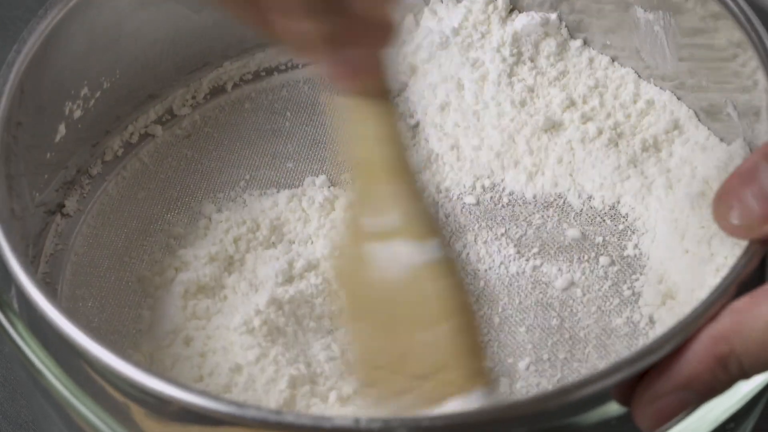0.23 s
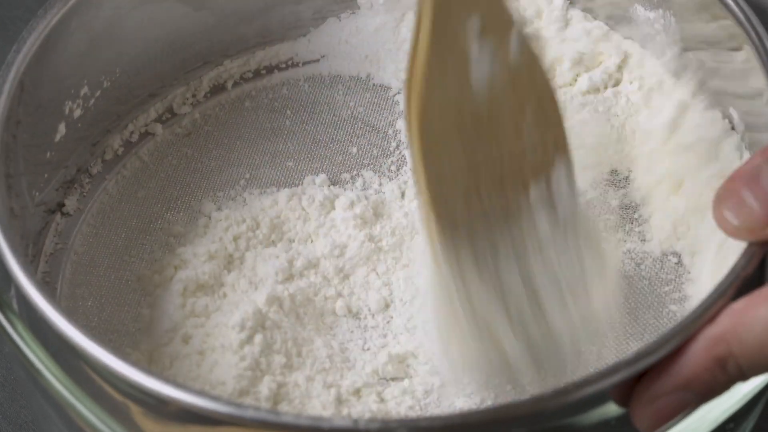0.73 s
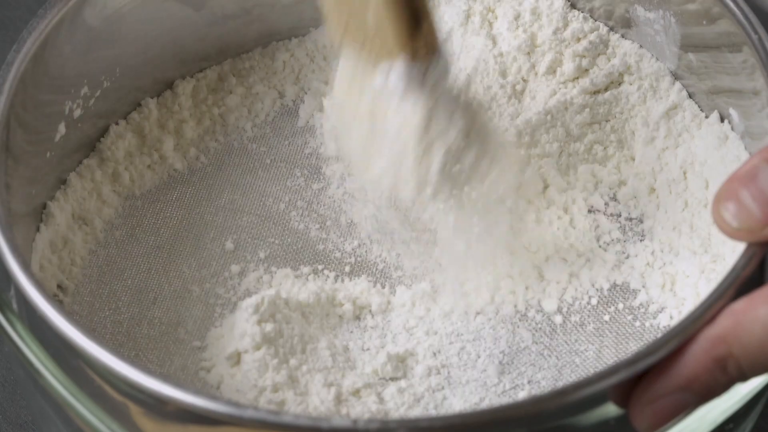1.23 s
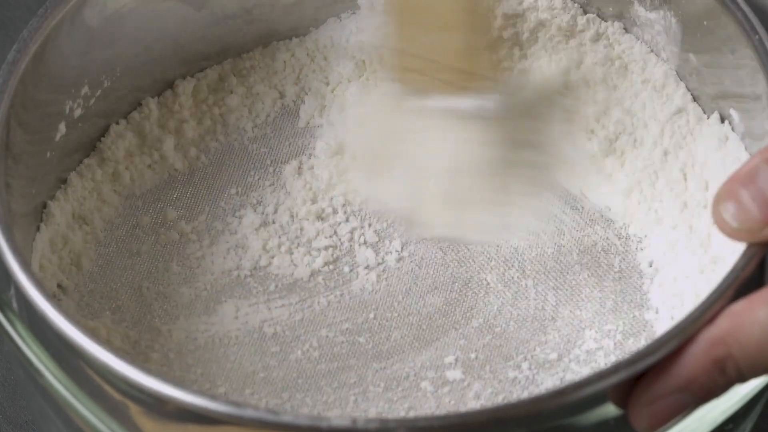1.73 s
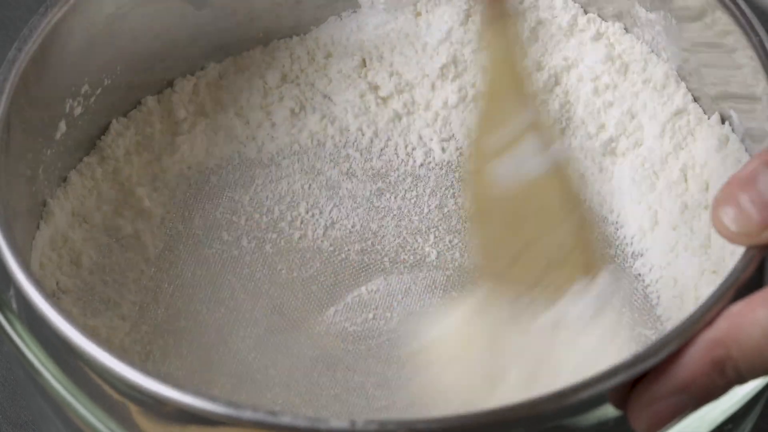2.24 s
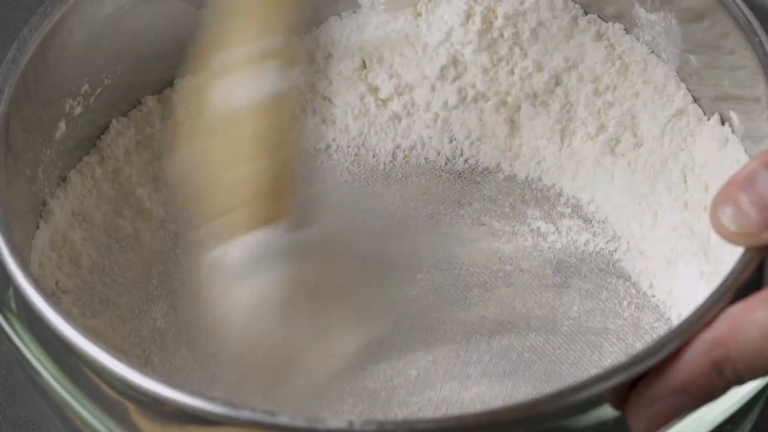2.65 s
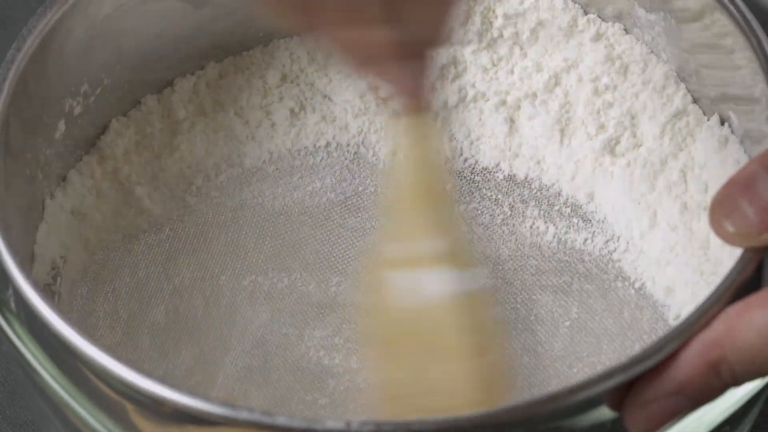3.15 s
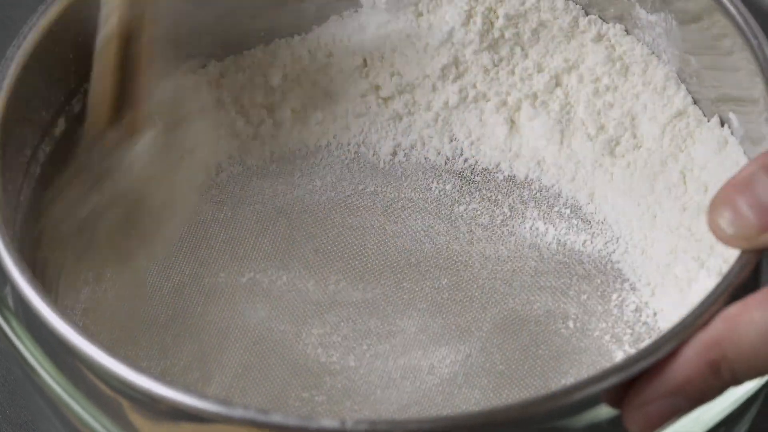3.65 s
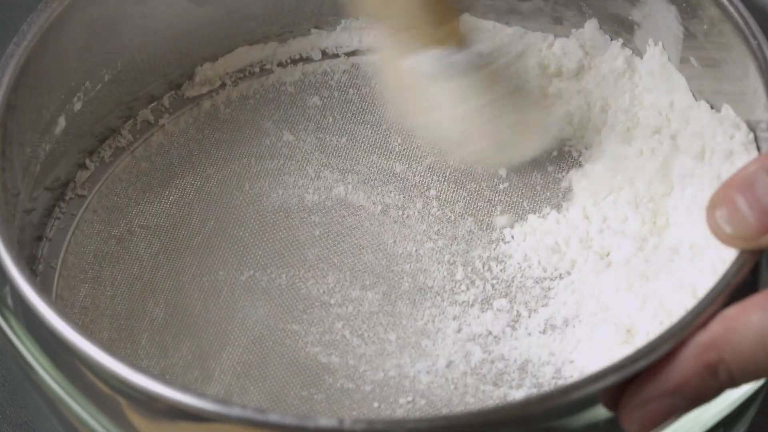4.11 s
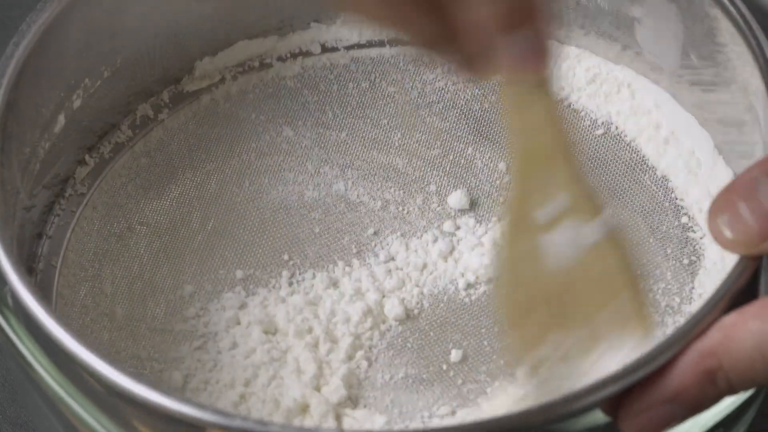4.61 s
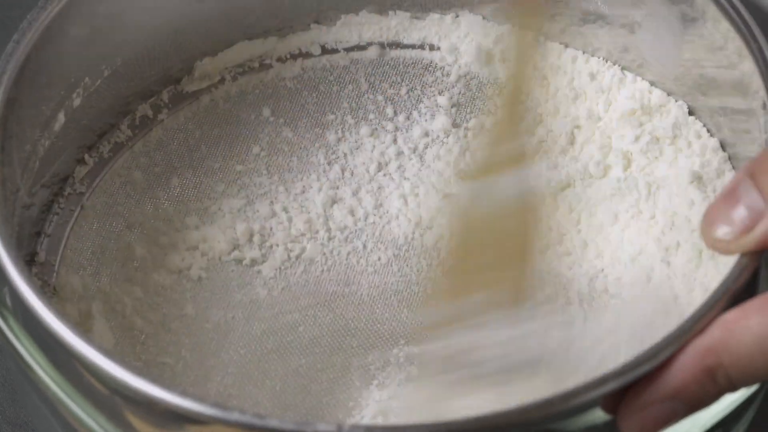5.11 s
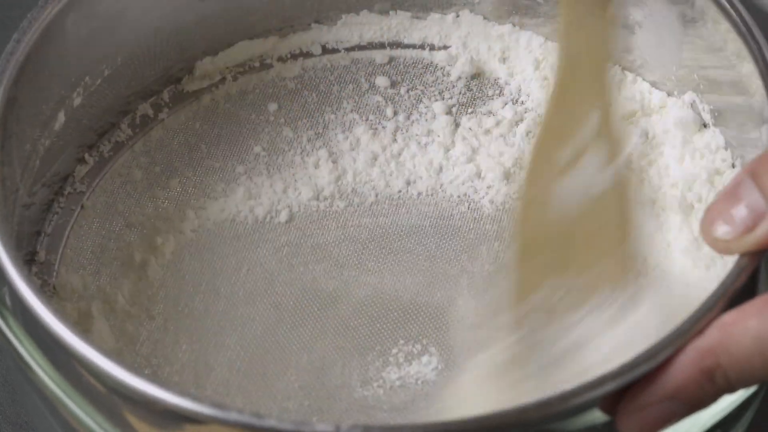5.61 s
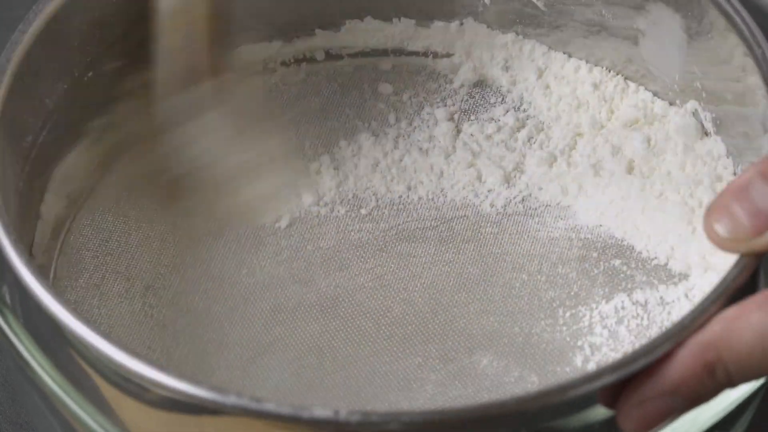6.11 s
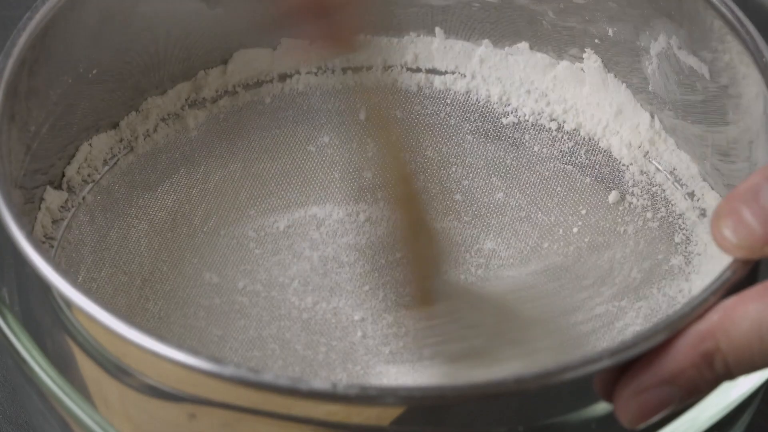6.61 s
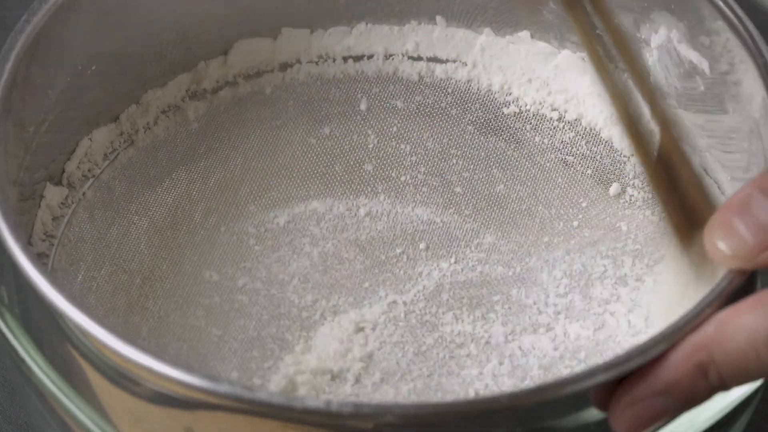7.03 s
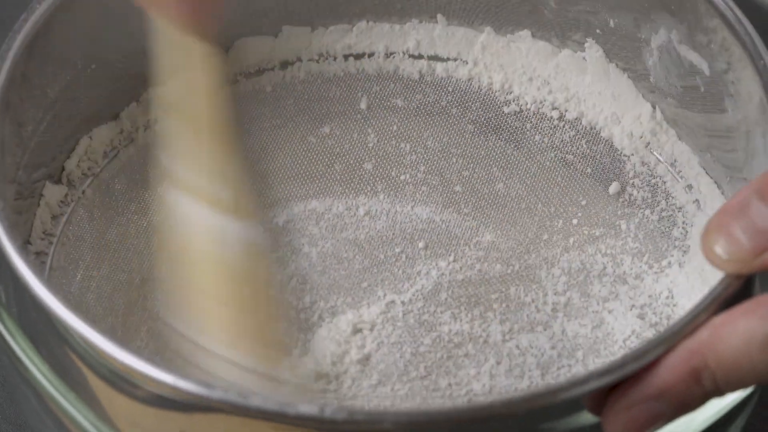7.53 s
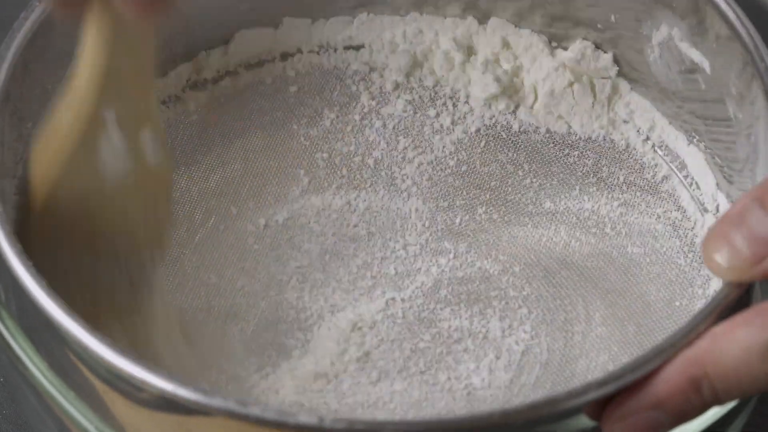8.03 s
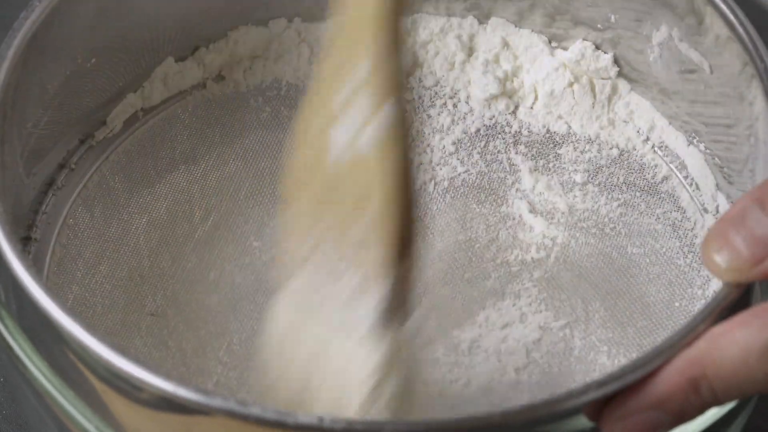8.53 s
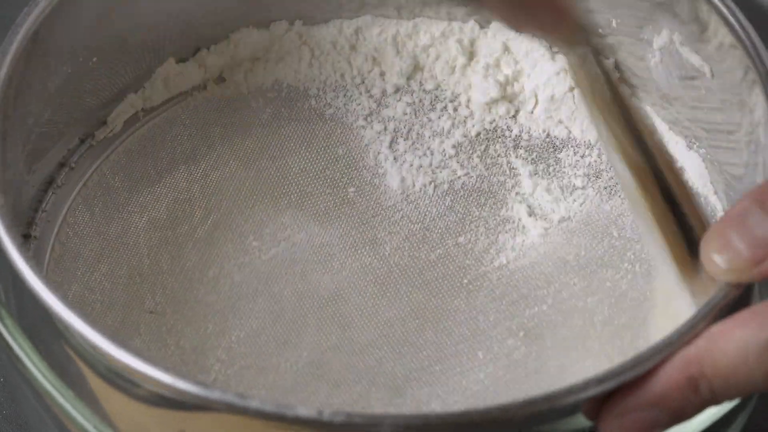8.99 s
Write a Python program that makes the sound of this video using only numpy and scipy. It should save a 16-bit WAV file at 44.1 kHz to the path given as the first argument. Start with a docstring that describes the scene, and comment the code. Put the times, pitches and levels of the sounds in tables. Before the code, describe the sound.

Close, dry, raspy brushing of flour over wire mesh in a quiet kitchen, quick strokes with fizzing hiss and a brief handle knock.

```python
"""Brisk scraping is heard first: a bristle brush scrubs flour through a fine steel sieve in a quiet kitchen.
Bristle flicks are dense random impulses; filtered, they make the drumming mesh, the scrape and the wire hiss.
The wooden handle knocks the rim a few times: damped sines and noise bursts, with a short reverberant tail.
Short ticks and soft low bumps lie between; filtered noise gives the room tone and a fuzzy hum.
The microphone is close and mono, copied to both channels."""
import sys
import numpy as np
from scipy import signal
from scipy.fft import rfft, irfft, next_fast_len
from scipy.io import wavfile
from scipy.ndimage import uniform_filter1d

SR = 44100
rng = np.random.default_rng(int(sys.argv[2]) if len(sys.argv) > 2 else 0)


def dump(signal):
    """Clip the signal to [-1, 1] and save it as 16-bit WAV at the path in sys.argv[1]."""
    limited = np.clip(np.atleast_2d(signal).T, -1, 1)
    pcm = np.round(limited * 32767).astype(np.int16)
    wavfile.write(sys.argv[1], SR, pcm)


N = 408366  # length in samples

# pressed strokes: [fastest moment t/s, speeding up t/s, slowing down t/s, scrape level/dB,
#   wire hiss level/dB re scrape, drumming level/dB re scrape, low edge of drumming f/Hz]; before LAYER_TRIM
STROKES = [(0.043, 0.032, 0.11, -41.0, -5, -3.5, 794), (0.086, 0.098, 0.08, -53, -3.5, 0.5, 794),
           (0.378, 0.044, 0.081, -39.5, -5.0, -2.5, 850), (0.704, 0.083, 0.092, -41, -7, -6.5, 620),
           (0.999, 0.077, 0.3, -48.5, -1.5, -6, 686), (1.131, 0.218, 0.16, -47, -4.0, -1.5, 680),
           (1.487, 0.054, 0.1, -67, 1.5, -9.5, 595), (1.721, 0.052, 0.1, -42, -3, -5.5, 593),
           (1.847, 0.23, 0.19, -46.5, -4.5, -0.5, 597), (1.965, 0.14, 0.11, -43.0, -7, -8, 535),
           (2.08, 0.11, 0.11, -44.5, 0, -2.5, 604), (2.187, 0.079, 0.084, -53, 2.5, -0.5, 620),
           (2.264, 0.097, 0.15, -48, -1, -6, 604), (2.368, 0.092, 0.109, -46.5, -3.5, -2, 610),
           (2.475, 0.075, 0.17, -48.5, -6, -5.5, 940), (2.565, 0.12, 0.076, -43.5, -3, -7, 616),
           (2.634, 0.041, 0.078, -54.5, 3, -3, 730), (2.725, 0.08, 0.1, -46, -1.5, -8.5, 655),
           (2.818, 0.089, 0.089, -45.5, -2.5, -6, 616), (2.896, 0.049, 0.13, -49.5, 0, -3, 610),
           (3.165, 0.11, 0.27, -49.0, -2, -9.5, 1160), (3.307, 0.065, 0.09, -46, -5.5, -9.5, 875),
           (3.605, 0.13, 0.25, -51, 1.5, -15.5, 1090), (3.743, 0.159, 0.29, -53.5, 1, -9.5, 830),
           (3.911, 0.23, 0.16, -48.5, -3.5, -9.5, 810), (4.034, 0.167, 0.062, -64.5, 1.5, -25, 970),
           (4.289, 0.072, 0.116, -55.5, 1, -16, 1270), (4.352, 0.076, 0.1, -52.5, -3.5, -20, 1330),
           (4.421, 0.041, 0.084, -52.5, -1.5, -8, 920), (4.763, 0.078, 0.082, -44, -4, -5, 760),
           (5.036, 0.13, 0.27, -47.5, -4.5, -9.0, 610), (5.084, 0.148, 0.11, -42, -4, -5, 590),
           (5.334, 0.15, 0.12, -39.5, -3.0, -9, 805), (5.5, 0.2, 0.2, -51, -1, -10.5, 605),
           (5.62, 0.21, 0.1, -43, -1, -11, 583), (5.735, 0.088, 0.158, -47, -1, -12.5, 540),
           (5.87, 0.12, 0.062, -42, 0, -9.5, 760), (6.079, 0.12, 0.169, -46.5, 1, -10, 1190),
           (6.162, 0.111, 0.141, -47.5, -4, -5.5, 1100), (6.29, 0.18, 0.22, -47.5, 0.0, -11, 1020),
           (6.37, 0.096, 0.167, -59.5, -3.5, -25, 1250), (6.704, 0.087, 0.085, -47.5, -3.0, -10, 690),
           (6.946, 0.045, 0.078, -44.0, -1, -6.5, 620), (7.201, 0.05, 0.129, -50, -10, -15, 720),
           (7.232, 0.12, 0.062, -54.5, 2.5, -7.5, 736), (7.442, 0.043, 0.096, -41.5, -5.5, -11.5, 960),
           (7.689, 0.056, 0.1, -46.5, -2.5, -17.5, 1100), (7.786, 0.089, 0.11, -41, -5, -11, 940),
           (8.119, 0.14, 0.2, -42.5, -4, -14, 1050), (8.176, 0.13, 0.1, -49.5, -14, -2, 825),
           (8.46, 0.1, 0.17, -55, -0.5, -15.5, 1150), (8.495, 0.085, 0.062, -37.5, -4, -16.5, 1210),
           (8.709, 0.07, 0.059, -44, -3.5, -11.5, 1050), (8.908, 0.04, 0.14, -45, -9, -13.5, 1100),
           (8.938, 0.075, 0.06, -38, -1.5, -14.5, 1100), (9.159, 0.047, 0.067, -41, -3, -19.5, 1180)]
# light touches of the bristle tips as the brush lands, turns or lifts:
#   [peak t/s, rise t/s, fall t/s, hiss level/dB, scrape level/dB re hiss]; before LAYER_TRIM
GRAZES = [(0.012, 0.044, 0.152, -69, -8), (0.29, 0.032, 0.068, -69.5, -15), (0.612, 0.053, 0.132, -60, -18),
          (0.919, 0.041, 0.149, -65, -11), (1.206, 0.033, 0.062, -58, -10), (2.439, 0.031, 0.076, -52, -7),
          (3.038, 0.24, 0.12, -61, -4), (3.504, 0.053, 0.13, -57, -17), (4.227, 0.022, 0.038, -66, -2),
          (4.471, 0.056, 0.039, -59.5, -7), (4.657, 0.042, 0.14, -62.5, -15), (4.95, 0.027, 0.15, -73.5, 0),
          (5.214, 0.066, 0.06, -54.0, -5), (5.989, 0.13, 0.043, -49.5, -9),
          (6.448, 0.0087, 0.036, -58.5, -8), (6.606, 0.028, 0.069, -59, -15),
          (6.864, 0.029, 0.081, -64, -15), (7.11, 0.029, 0.096, -60, -13), (7.38, 0.042, 0.047, -56.5, -13),
          (7.63, 0.075, 0.16, -60.5, -15), (8.005, 0.037, 0.12, -60.0, -13),
          (8.266, 0.045, 0.053, -56.5, -5), (8.376, 0.046, 0.21, -67.5, -4),
          (8.567, 0.014, 0.03, -63.5, -3), (8.867, 0.042, 0.016, -60.5, -11),
          (9.082, 0.033, 0.056, -58.5, -14)]
# exponent of stroke speed giving each layer's amplitude: [scrape, drumming, hiss]
SPEED_POWER = (3.64, 3.15, 2.76)
# gain of each layer: [scrape level/dB, drumming level/dB, hiss level/dB]
LAYER_TRIM = (0.5, -0.1, 0.92)
# flour trickling between strokes: [scrape level/dB, drumming level/dB, hiss level/dB]; before no trim
REST_LEVEL = (-83.5, -92.5, -84.5)
# spectral shapes of the three brush layers: [f/Hz, relative level/dB per Hz]
SCRAPE_SHAPE = [(900, -49), (1500, -17), (2000, -1.5), (3000, 0), (4000, 1.5), (5500, -5), (7000, -10.5),
                (10000, -45)]
DRUM_SHAPE = [(150, -43), (450, -20), (650, -3.5), (950, -2), (1300, 1.5), (1550, -4), (2000, -10),
              (3000, -59)]
HISS_SHAPE = [(3500, -26.5), (5500, -6), (6500, -8), (8000, -1), (10000, -2.5), (12000, -6), (14000, -9.5),
              (16000, -12)]
# moving peak of the scrape band, flattening as the mesh clears: [t/s, centre f/Hz, height level/dB]
SCRAPE_PEAK = [(0.06, 2660, 8), (0.7, 2740, 9.5), (1.05, 2780, 2), (1.8, 2800, 7), (2.1, 3050, 8),
               (2.3, 2920, 8.5), (2.7, 3100, 10.5), (3.1, 3060, 10), (3.3, 2810, 7), (3.62, 2990, 5.5),
               (3.9, 2720, 5.5), (4.4, 3050, 6), (5.0, 2800, 5), (5.25, 3120, 6), (5.8, 3080, 5.5),
               (6.3, 2720, 2), (7.0, 2700, 1), (7.8, 3130, 3), (8.1, 2820, 2), (9.0, 3750, 0)]
# modes of the sieve under the brush: [f/Hz, width f/Hz, rise level/dB]
SIEVE_MODES = [(631, 49, 5.5), (1275, 60, 3), (1975, 420, 2), (3490, 390, 2.5), (6300, 130, 4),
               (8400, 230, 1), (9600, 180, 6), (11330, 130, 9), (13300, 100, 8), (15500, 150, 6)]
# handle on the rim: [t/s, click level/dB, click centre f/Hz, click decay/cycles, crack level/dB,
#   ring level/dB, hardness/(dB per octave)]; levels scale the raw sounds
KNOCKS = [(5.9186, -11.5, 1080, 1.03, -18, -40, 3.5), (5.922, -16.5, 2530, 2.1, -35, -41.5, 1.5),
          (5.948, -30, 8000, 5.4, -48, -70, 7.5), (5.951, -16, 780, 1.44, -16, -41.5, 3.5),
          (6.4111, -17, 5400, 3.1, -43, -48.5, 1), (6.414, -32, 4760, 7.1, -57, -66, 4.5),
          (6.642, -47, 1070, 1.5, -39.5, -76, 7)]
# modes of the rim's ring, before hardness and scatter: [f/Hz, relative level/dB, t60 t/s]
RIM_MODES = [(190.4, 1.5, 0.22), (224, -1, 0.092), (330, -5, 0.088), (395, -1.5, 0.054), (586, -15, 0.13),
             (688, -4.5, .07), (1010, -12, 0.022), (2110, -3.5, 0.024), (2600, -9, 0.025),
             (3270, -5, 0.028), (3574, 8.5, 0.011), (4170, -11, 0.028), (5070, -11, 0.027)]
# short ticks, some of them the sharp onset of a light hissing touch: [t/s, relative level/dB, centre f/Hz]
TICKS = [(0.547, -61, 4500), (0.603, -56, 5800), (0.904, -58, 5500), (1.317, -82, 8500),
         (1.576, -59.5, 4520), (4.104, -64, 5000), (4.217, -62, 4000), (4.872, -50, 3270),
         (4.936, -54, 3600), (6.847, -68, 7000), (7.093, -62, 7500), (7.908, -59, 4000), (7.999, -47, 3520)]
# soft low bumps: [t/s, envelope peak level/dB, f/Hz]
THUMPS = [(2.12, -61, 75), (4.657, -62, 170), (4.68, -67, 45), (6.6, -56, 99), (7.092, -65, 56.3),
          (7.615, -61, 146)]
# spectral shape of the room tone: [f/Hz, relative level/dB per Hz]
ROOM_SHAPE = [(12, -47), (20, 2.5), (53, -1.5), (86, 1.5), (130, -2), (446, -7.5), (513, -8), (738, -12),
              (849, -15), (2080, -18), (2600, -36), (9670, -57), (16000, -54)]
# fuzzy hum: [f/Hz, width f/Hz, rms level/dB]
HUM = [(143, 3.2, -83), (269, 31, -87)]

TRAIL_DB, TRAIL_T60_S = -17, 0.24  # the bowl and walls let each stroke trail off
GRAZE_POWER = 1.5  # amplitude of a graze = speed to this power
DRUM_LAG_S = 0.004  # the drumming follows once the bristles have dug in
HALF_PEAK_DB = -71  # at this scrape level the scrape peak has half its height in dB
EDGE_SAG_OCT = 0.26  # fall of the drumming edge from start to fastest moment, and again to the end
ROOM_DB, KNOCK_TAIL_DB = -74, -14.5  # room tone rms; tail gain re the dry knocks
TOP_HZ = 15760  # band limit


def brush():
    """Source-filter principle: one stream of flicks excites the scrape band, the mesh and the wires."""
    at, centre_hz, peak_db = np.transpose(SCRAPE_PEAK)
    hz, t, z = signal.stft(flicks(share=.6, spread_db=2), SR, nperseg=512)
    hz = hz[:, None]
    # flour lumps and bristle tufts leave uneven patches, deepest where the mesh has few modes
    field = uniform_filter1d(rng.standard_normal(z.shape), size=4, axis=0)
    field = uniform_filter1d(field, size=9, axis=1)
    patch_depth_db = 2.0 + 1.86 / (1 + (hz / 2500) ** 2)
    z = z * amp(patch_depth_db * unit(field))

    def octaves(centre):
        """Logarithmic pitch: the interval above a centre frequency, in octaves."""
        return np.log2((hz + 1) / centre)

    def sieve(f):
        """Modal resonance: each sieve mode lifts the response around its own frequency."""
        return amp(sum(db / (1 + (2 * (f - c) / w) ** 2) for c, w, db in SIEVE_MODES))

    levels = effort()
    firmness = levels[0] / (levels[0] + amp(HALF_PEAK_DB))
    firmness = np.interp(t, np.arange(N) / SR, firmness)
    off_peak = octaves(np.interp(t, at, centre_hz)) / .27
    peak = firmness * np.interp(t, at, peak_db) * np.exp(-(off_peak ** 2) ** 2)
    scrape = along(SCRAPE_SHAPE, hz) * amp(peak)
    # near the rim the mesh is stiffer, and the low edge of the drumming climbs
    edge = octaves(drum_edge(t))
    slope_db = 15.2 * np.minimum(edge, 0)
    bump_db = 4.7 * np.exp(-((edge - .15) / 0.026) ** 2)  # a narrow bump just above the edge
    drum = along(DRUM_SHAPE, hz) * amp(slope_db + bump_db)
    out = np.zeros(N)
    for shape, level in zip((scrape, drum, along(HISS_SHAPE, hz)), levels):
        shape = shape / np.linalg.norm(shape, axis=0)  # the shape alone, without loudness
        steady = signal.istft(z * shape, SR, nperseg=512)[1][:N]
        out += level * unit(filtered(steady, sieve))
    return out


def flicks(share, spread_db):
    """Shot noise: dense random impulses in a share of all samples, with scattered sizes and signs."""
    chance, size, sign = rng.random(N), rng.standard_normal(N), rng.standard_normal(N)
    return (chance < share) * sign * amp(spread_db * size)


def effort():
    """Incoherent addition: strokes, trails and grazes sum as powers to the three layer amplitudes."""
    t = np.arange(0, N / SR, .002)
    peak, rise, fall, db, hiss_db, drum_db, _ = np.transpose(STROKES)
    *touch, graze_db, scrape_db = np.transpose(GRAZES)
    stroke = speed(peak, rise, fall, t)
    graze = speed(*touch, t) ** (2 * GRAZE_POWER)
    # grazes do not drum the mesh
    grazes = amp(2 * (graze_db + scrape_db)) @ graze, 0, amp(2 * graze_db) @ graze
    keep = amp(-120 * t[1] / TRAIL_T60_S)  # share of power left after one 2 ms step
    layers = zip((0, drum_db, hiss_db), grazes, (0, DRUM_LAG_S, 0), SPEED_POWER, LAYER_TRIM, REST_LEVEL)
    out = []
    for own_db, light, lag, exponent, trim_db, rest_db in layers:
        power = amp(2 * (db + own_db)) @ stroke ** (2 * exponent)
        trail = signal.lfilter([1 - keep], [1, -keep], power)
        power = power + amp(2 * TRAIL_DB) * trail + light
        level = np.sqrt(amp(2 * trim_db) * power + amp(2 * rest_db))
        out.append(np.interp(np.arange(N) / SR - lag, t, level))
    return out


def speed(peak, rise, fall, t):
    """Kinematics: speed 0-1, one row a movement, a quarter sine up and a quarter sine down."""
    u = t - peak[:, None]
    phase = np.where(u < 0, u / rise[:, None], u / fall[:, None])
    return np.cos(np.pi / 2 * np.clip(phase, -1, 1)).clip(0)


def drum_edge(t):
    """Power-weighted mean: the low edge in Hz sinks through each stroke, and the strongest leads."""
    peak, rise, fall, db, _, drum_db, edge_hz = np.transpose(STROKES)[..., None]
    phase = np.clip(np.where(t < peak, (t - peak) / rise, (t - peak) / fall), -1, 1)
    weight = amp(2 * (db + drum_db)) * np.cos(np.pi / 2 * phase) ** (2 * SPEED_POWER[1]) + 1e-12
    sinking_hz = edge_hz * 2 ** (-EDGE_SAG_OCT * phase)
    return np.sum(weight * sinking_hz, axis=0) / np.sum(weight, axis=0)


def knocks():
    """Impact excitation: a blow clicks, cracks and rings the rim; hardness raises the upper modes."""
    out, t = np.zeros(N), np.arange(SR // 4) / SR
    for s, click_db, hz, cycles, crack_db, ring_db, hard_db in KNOCKS:
        ring = np.zeros(len(t))
        for f, db, t60 in RIM_MODES:
            mode_db = db + hard_db * np.log2(f / RIM_MODES[0][0]) + rng.normal(0, 1.6)
            ring += amp(mode_db - 60 * t / t60) * np.sin(2 * np.pi * f * t)
        ring *= 1 - np.exp(-t / 0.0011)  # soft onset
        add(out, s, amp(ring_db) * ring + amp(click_db) * click(hz, cycles, t))
        add(out, s, amp(crack_db) * crack(t, 0.014))
    # so small an object radiates nothing far below its lowest mode
    return signal.sosfilt(signal.butter(6, 150, "high", fs=SR, output="sos"), out)


def click(hz, cycles, t):
    """Damped oscillation: a sine and noise under an exponential decay lasting some cycles."""
    envelope = np.exp(-t * hz / cycles) * (1 - np.exp(-t / 0.0009))
    return envelope * (np.sin(2 * np.pi * hz * t) + 0.59 * rng.standard_normal(len(t)))


def crack(t, t60):
    """Broadband transient: an exponentially decaying burst of noise, low-passed at 5 kHz."""
    noise = signal.lfilter(*signal.butter(4, 5000, fs=SR), rng.standard_normal(len(t)))
    return amp(-60 * t / t60) * noise


def kitchen(x):
    """Reverberation: convolution with decaying noise, a short answer from the bowl below and the walls."""
    t = np.arange(SR // 4) / SR
    tail = amp(-60 * t / 0.32) * rng.standard_normal(len(t)) * (t > .003)
    return signal.fftconvolve(x, tail / np.linalg.norm(tail))[:N]


def small_sounds():
    """Transient excitation: short ticks click and crack; low bumps are sines that swell and die away."""
    out, t = np.zeros(N), np.arange(SR // 10) / SR
    for s, db, hz in TICKS:
        add(out, s, amp(db) * (0.81 * click(hz, 8.9, t) + 1.25 * crack(t, 0.011)))
    for s, db, hz in THUMPS:
        u = t * hz / 0.72  # the envelope is largest after 0.72 cycle
        add(out, s, amp(db) * np.e * u * np.exp(-u) * np.sin(2 * np.pi * hz * t))
    return out


def room_tone():
    """Stationary noise: spectrally shaped rumble and hiss, with narrow noise bands as a fuzzy hum."""
    tone = amp(ROOM_DB) * unit(filtered(rng.standard_normal(N), lambda f: along(ROOM_SHAPE, f)))
    for centre, width, db in HUM:
        band = filtered(rng.standard_normal(N), lambda f: 1 / (1 + (2 * (f - centre) / width) ** 2))
        tone += amp(db) * unit(band)
    return tone


def amp(db):
    """Decibel law: level in dB to amplitude gain."""
    return 10 ** (np.asarray(db) / 20)


def unit(x):
    """Normalisation: x scaled to an rms of 1."""
    return x / np.sqrt(np.mean(x ** 2) + 1e-20)


def along(points, hz):
    """Spectral envelope: gain interpolated in dB between points on a log frequency axis."""
    f, db = np.transpose(points)
    return amp(np.interp(np.log(hz + 1), np.log(f + 1), db))


def filtered(x, response):
    """Linear filtering: the spectrum of x times a response of frequency."""
    m = next_fast_len(N + SR // 4)
    return irfft(rfft(x, m) * response(np.fft.rfftfreq(m, 1 / SR)), m)[:N]


def add(track, s, sound):
    """Superposition: a sound is summed into the track from time s in seconds."""
    part = track[round(s * SR):][:len(sound)]
    part += sound[:len(part)]


def scene():
    """Superposition: all sources sum at one microphone, copied to both channels."""
    blows = knocks()
    mono = brush() + blows + amp(KNOCK_TAIL_DB) * kitchen(blows) + small_sounds() + room_tone()
    return np.array([mono, mono])


def record(dry):
    """Band limitation: nothing is kept from TOP_HZ upwards."""
    return np.array([filtered(x, lambda f: f < TOP_HZ) for x in dry])


dry = scene()
out = record(dry)
dump(out)
```